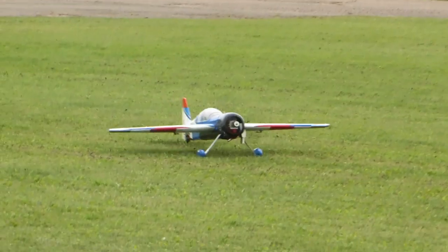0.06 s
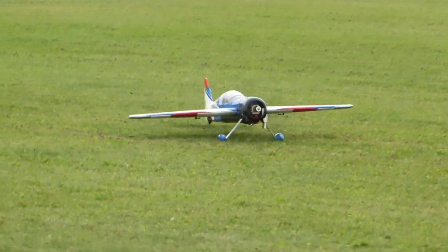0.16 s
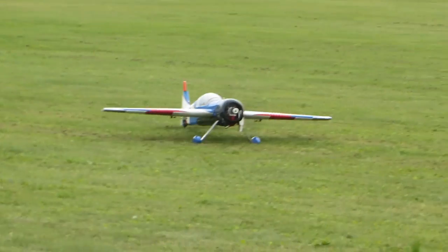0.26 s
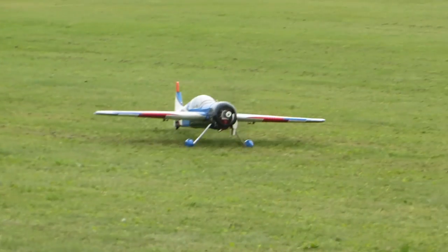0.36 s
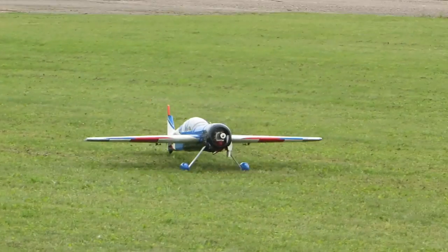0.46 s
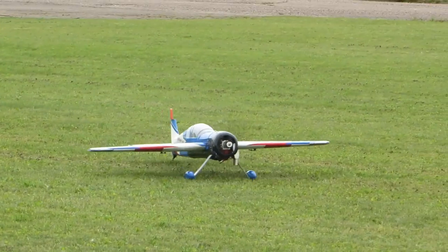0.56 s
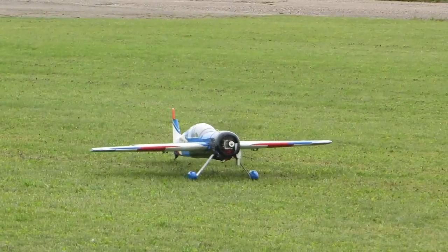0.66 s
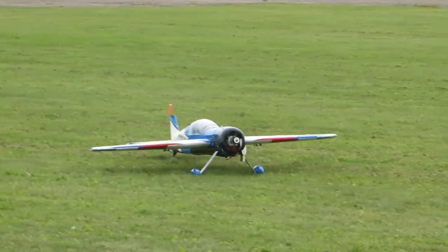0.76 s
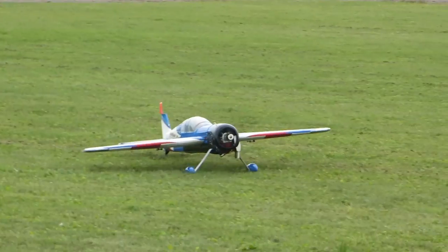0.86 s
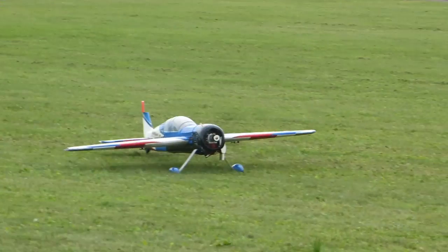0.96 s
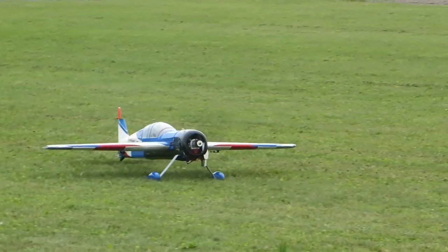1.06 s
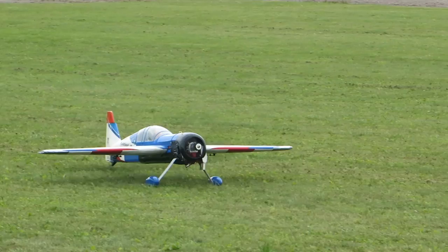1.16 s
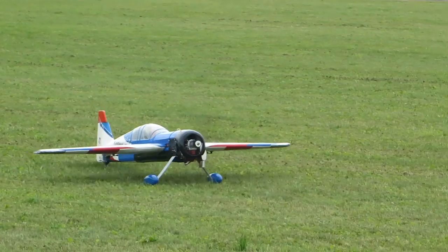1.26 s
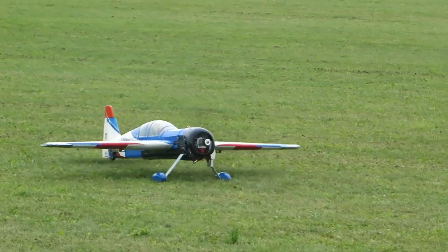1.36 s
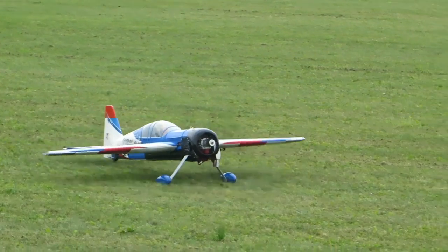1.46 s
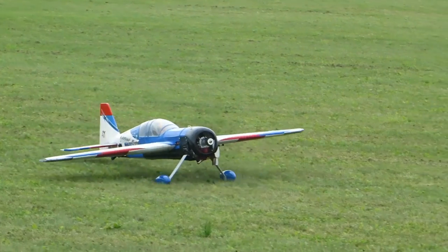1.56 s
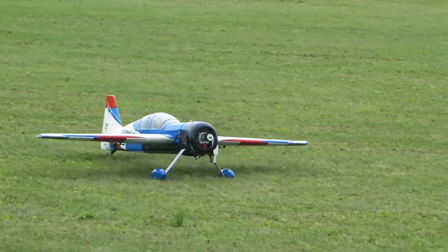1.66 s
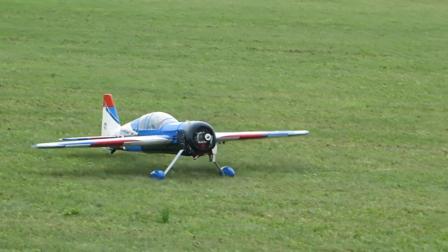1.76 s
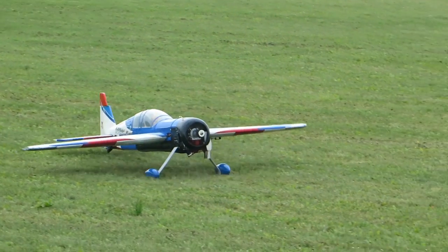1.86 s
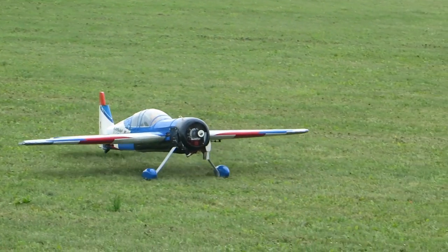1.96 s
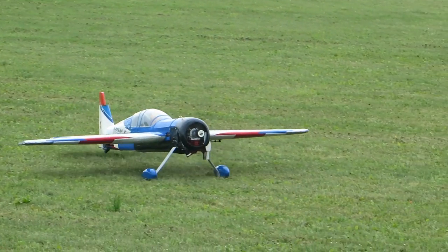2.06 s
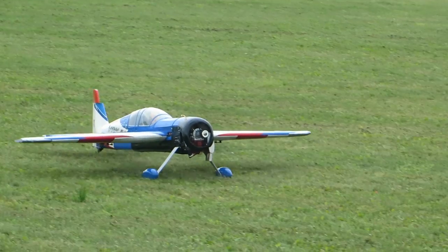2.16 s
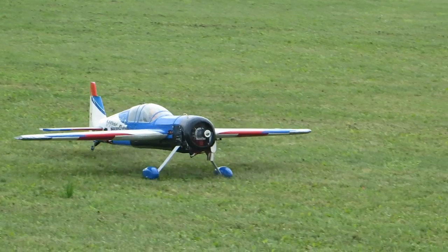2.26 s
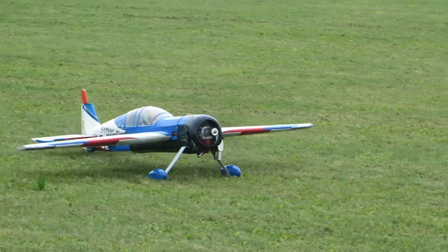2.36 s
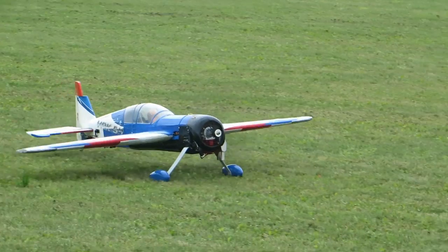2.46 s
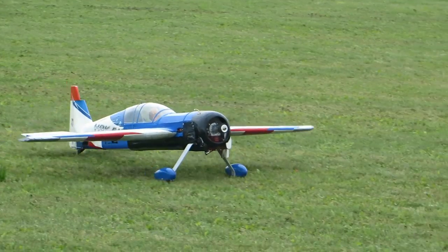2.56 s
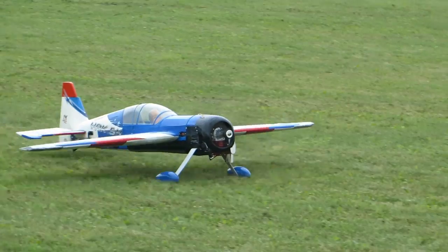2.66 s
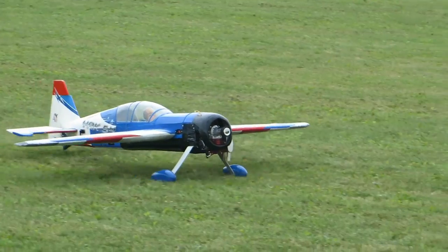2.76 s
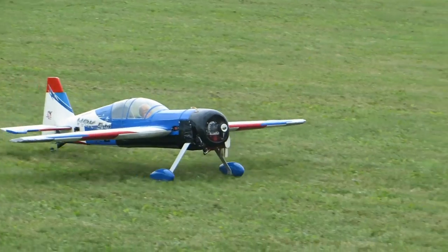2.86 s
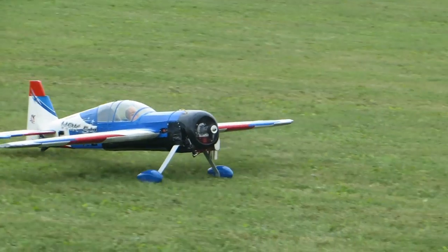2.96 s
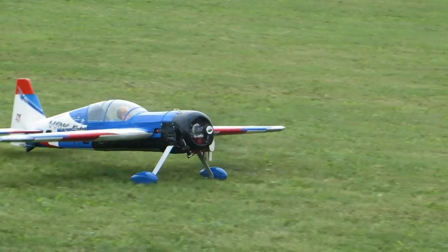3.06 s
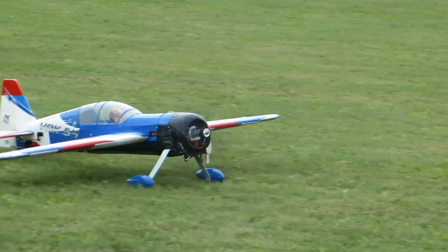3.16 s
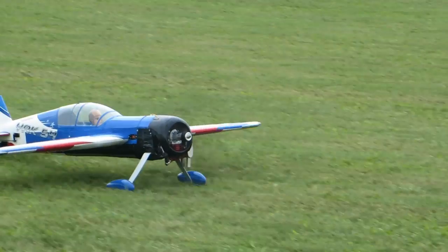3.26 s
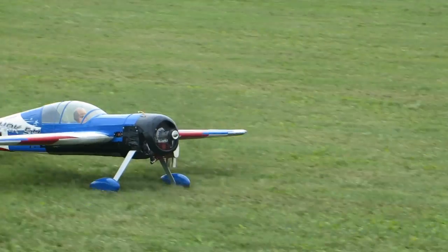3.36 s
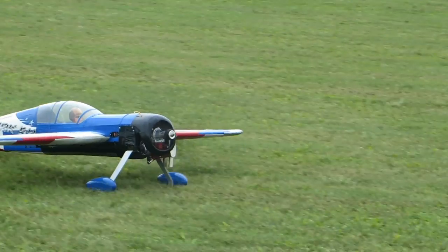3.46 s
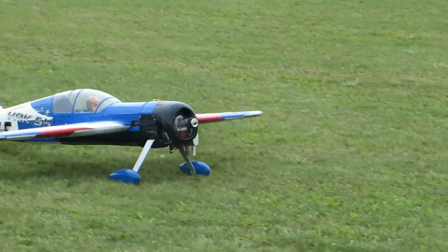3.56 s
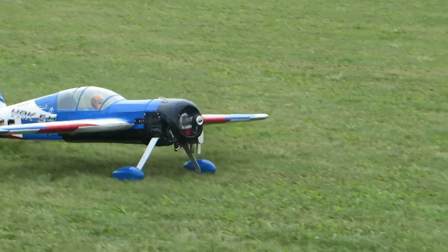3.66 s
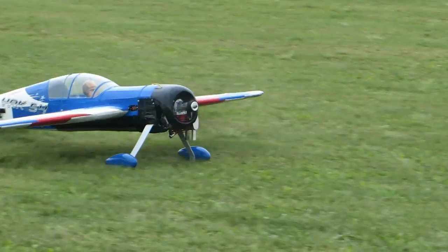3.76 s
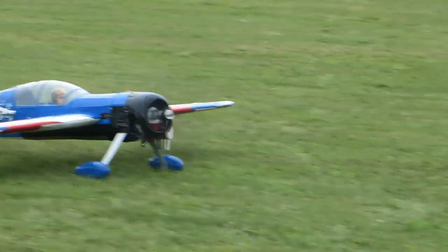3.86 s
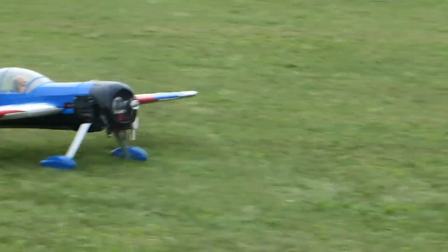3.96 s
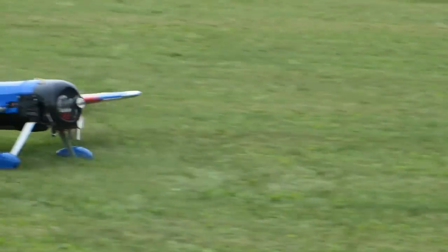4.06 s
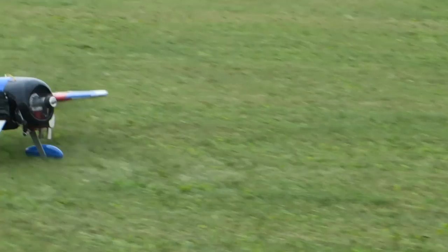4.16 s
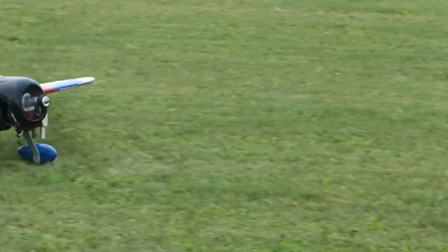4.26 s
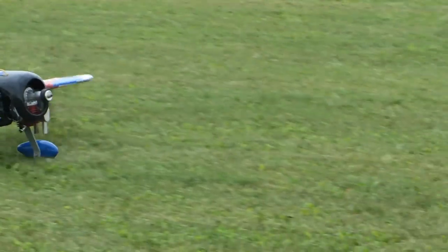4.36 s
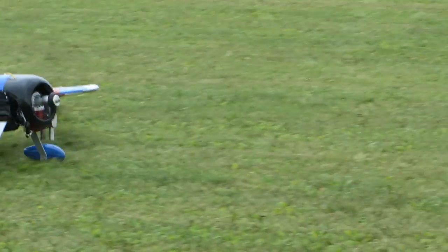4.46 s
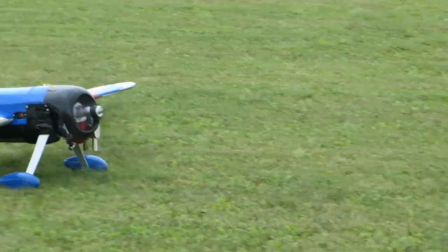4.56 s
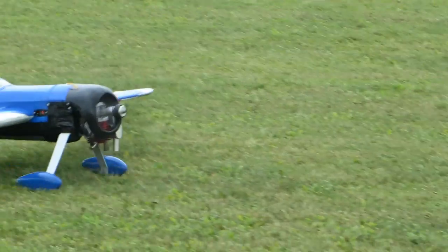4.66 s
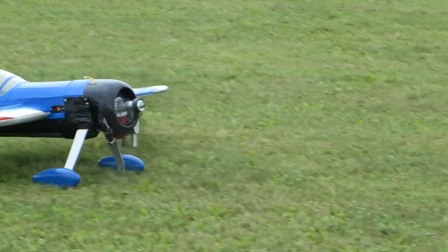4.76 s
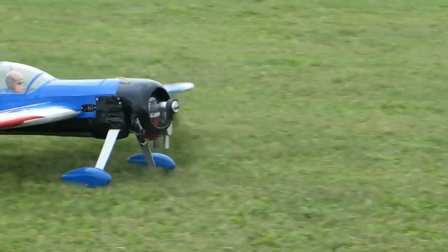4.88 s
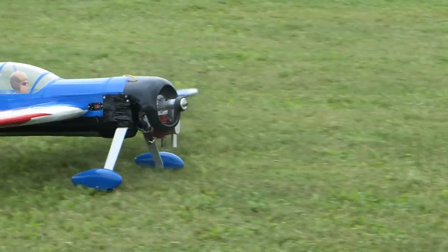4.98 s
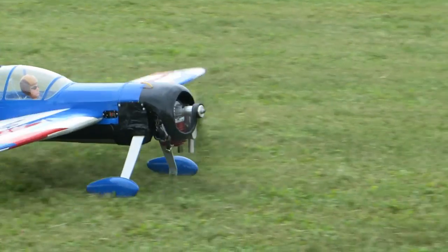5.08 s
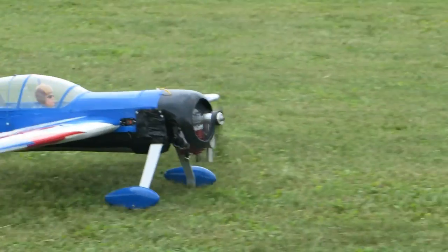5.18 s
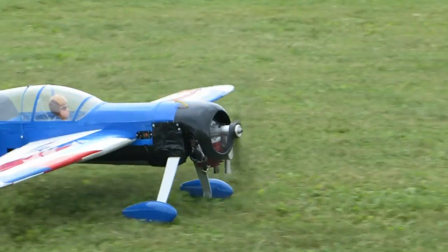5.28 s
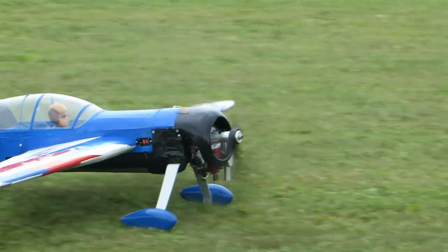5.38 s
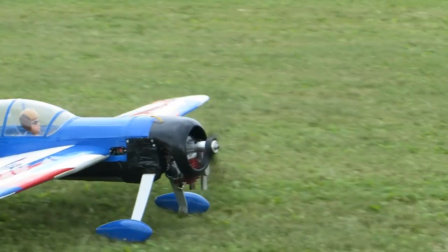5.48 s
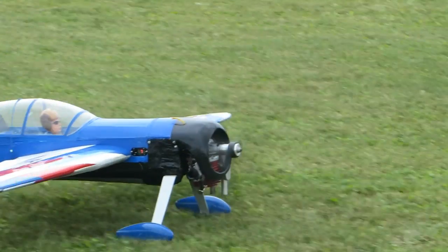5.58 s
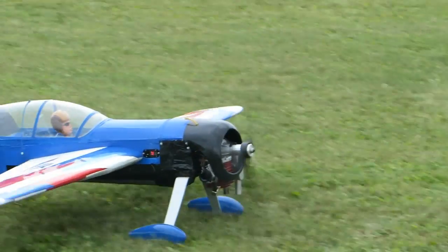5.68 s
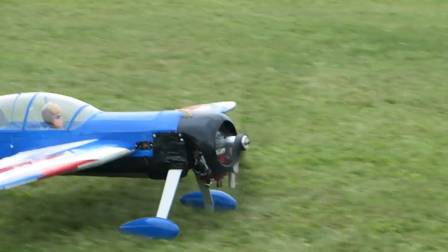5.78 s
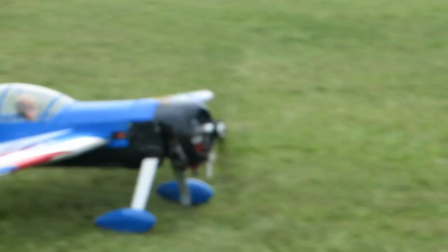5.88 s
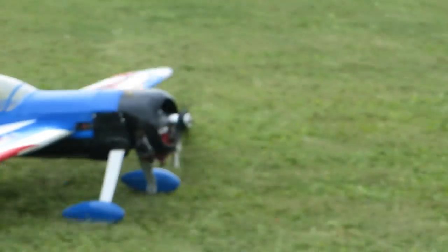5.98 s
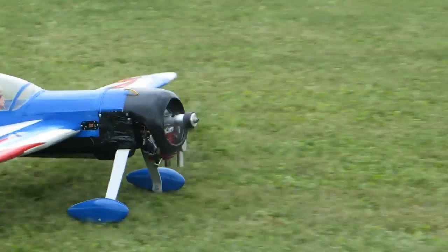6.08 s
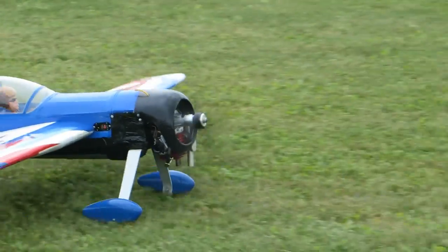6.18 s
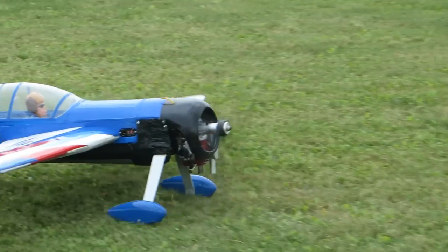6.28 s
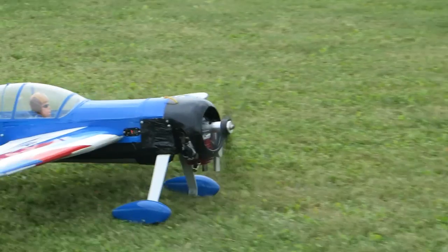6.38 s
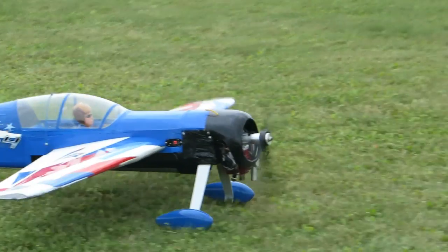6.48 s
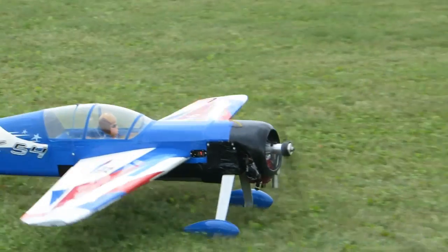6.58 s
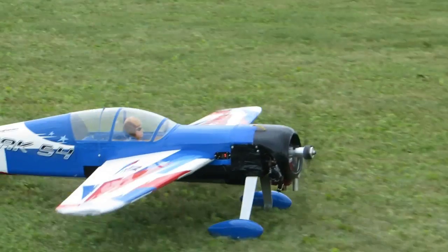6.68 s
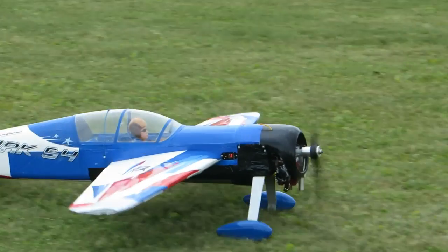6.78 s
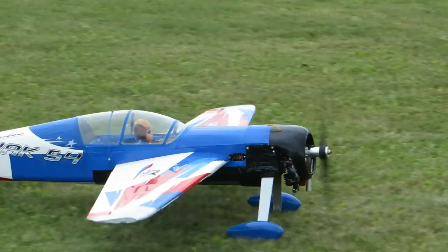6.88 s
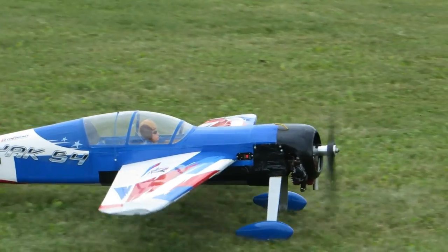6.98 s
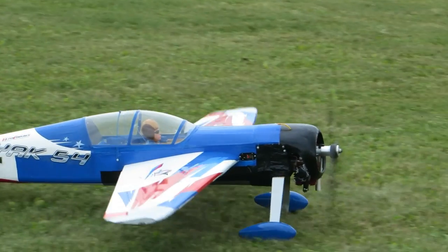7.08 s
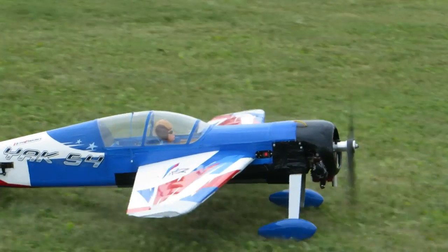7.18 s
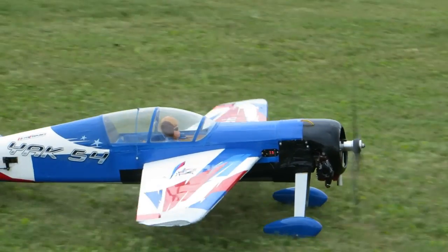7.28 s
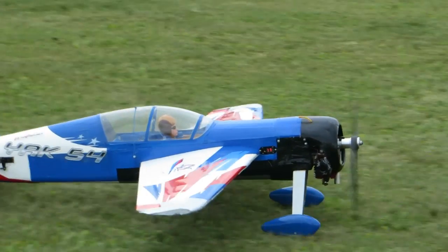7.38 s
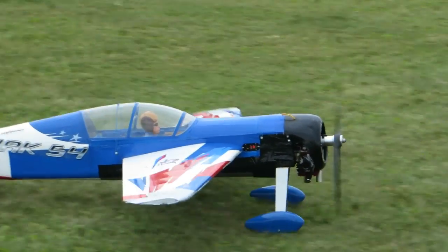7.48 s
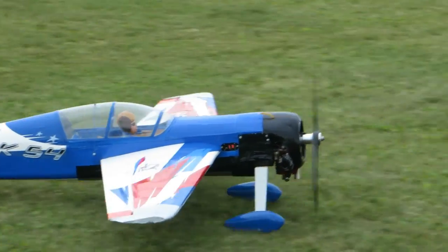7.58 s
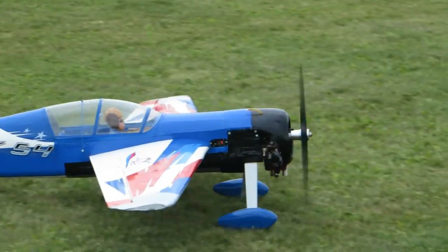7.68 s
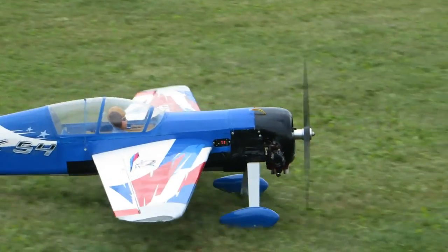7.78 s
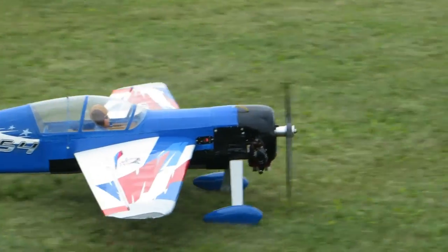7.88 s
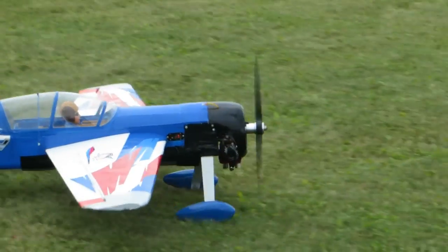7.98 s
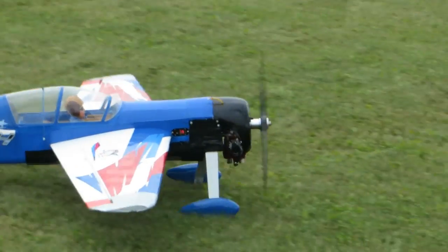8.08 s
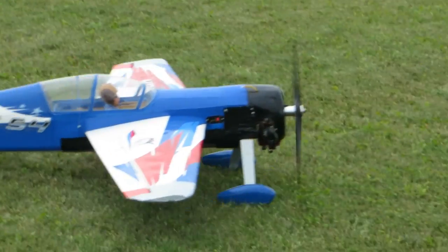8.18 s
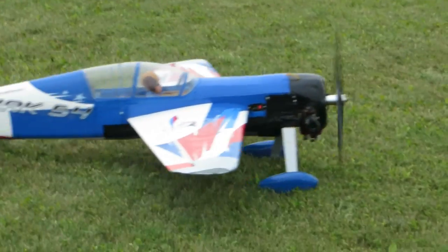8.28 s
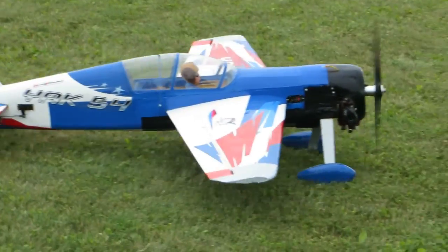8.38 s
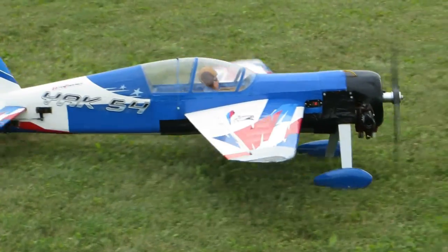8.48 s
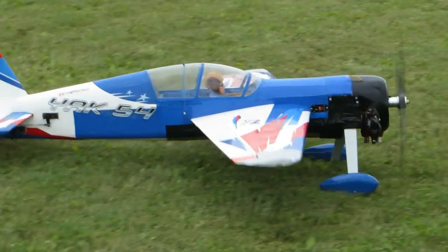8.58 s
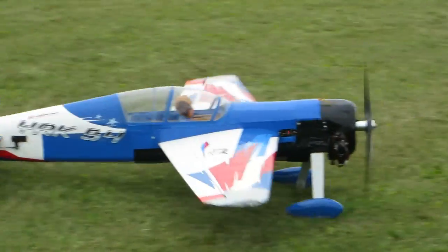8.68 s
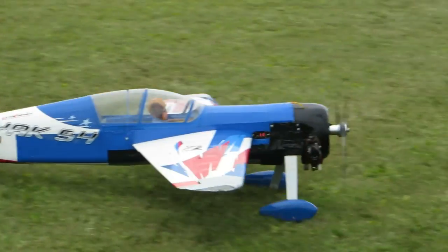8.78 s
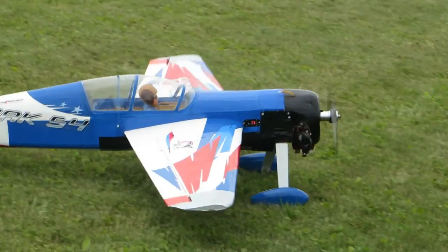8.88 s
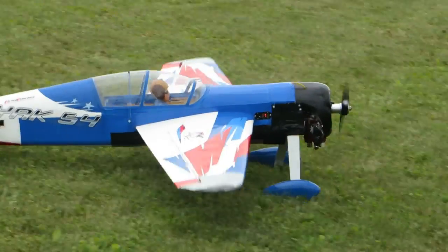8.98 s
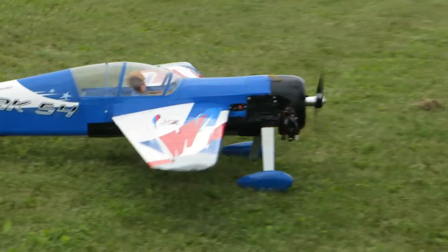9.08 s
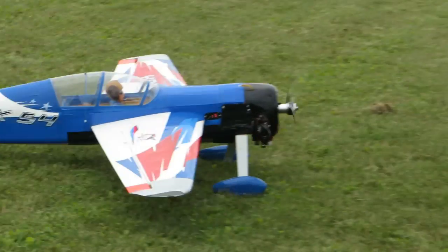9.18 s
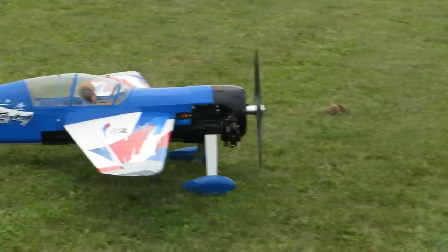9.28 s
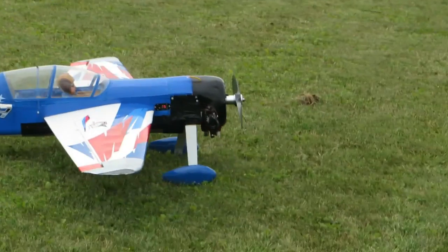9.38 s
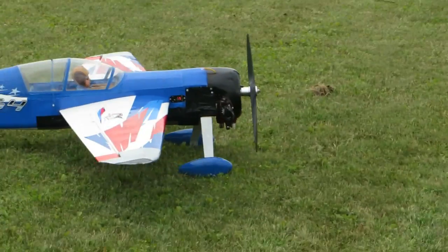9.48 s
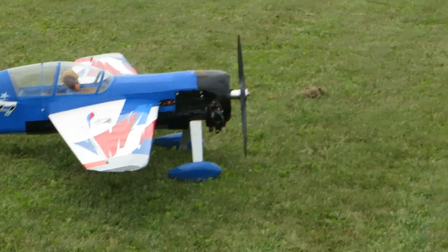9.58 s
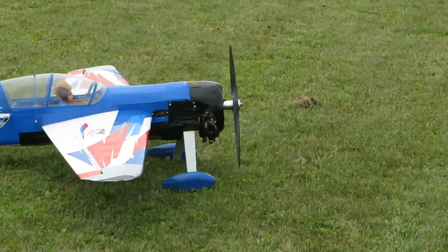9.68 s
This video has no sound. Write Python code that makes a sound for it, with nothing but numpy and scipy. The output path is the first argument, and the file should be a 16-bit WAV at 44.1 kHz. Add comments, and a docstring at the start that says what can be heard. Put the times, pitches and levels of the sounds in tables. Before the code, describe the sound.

A model aircraft's two-stroke petrol engine is already running, puttering quickly and unevenly as it taxis closer over an open grass field. Each firing gives an exhaust pop and a bright metallic crack, with hollow pipe puffs in between, over a low hum, a tinny rattle of loose parts and an airy propeller rasp. The throttle blips briefly at about 1.6 and 2 seconds, more strongly at 3.1, and again around 4. From about 4.5 seconds the engine holds a lumpy idle, its bark a little fuller as the plane turns side-on. At 8.7 seconds it cuts out. The propeller coasts down with slowing, breathy chuffs and soft hollow rings until about 9.4, followed by a few faint knocks and ticks up to 9.7. Soft wind gusts rumble on the microphone now and then, over a faint steady outdoor hush.

```python
"""A model aircraft's two-stroke engine putters as it taxis closer over grass, turns side-on and is cut.
At idle it fires on about every second turn: an exhaust pop and a metallic crack, with a hollow pipe
puff on the missed turns. The shaft hums, loose parts rattle and the propeller tears the air.
After the cut the propeller coasts down against compression; slack parts knock, pipe and intake ring.
Wind buffets the microphone over the hush of an open field."""
import sys
import numpy as np
from scipy import signal
from scipy.fft import rfft, irfft, next_fast_len
from scipy.io import wavfile
from scipy.ndimage import map_coordinates

SR = 44100
rng = np.random.default_rng(int(sys.argv[2]) if len(sys.argv) > 2 else 0)


def master_out(mix):
    """Clip the mix to full scale and print it as 16-bit PCM to the path in sys.argv[1]."""
    frames = np.transpose(np.atleast_2d(mix))
    ceiling = np.clip(frames, -1, 1)
    pcm = np.round(ceiling * 32767).astype(np.int16)
    wavfile.write(sys.argv[1], SR, pcm)


N = 429534
TIME = np.arange(N) / SR
IDLE_HZ = 40.5  # shaft turns a second
PULSE_LEAD_S = 200 / SR  # from the start of a pressure pulse to its peak

# Table levels are relative: each layer adds its own trim.
# shaft speed up to the cut: time_s, turns_per_s
SHAFT_SPEED = [(0.0594, 50.64), (0.24, 41.13), (0.35, 41.1), (0.46, 40.04), (0.57, 40.32), (0.68, 39.72),
               (0.79, 40.12), (0.9, 40.34), (1.03, 40.82), (1.16, 40.82), (1.28, 38.3), (1.38, 38.63),
               (1.48, 39.28), (1.64, 47.68), (1.75, 46.52), (1.86, 45.15), (2.02, 53.72), (2.2, 44.85),
               (2.31, 42.81), (2.41, 42.15), (2.52, 40.47), (2.66, 39.69), (2.8, 40.55), (2.94, 39.01),
               (3.04, 50.33), (3.14, 61.41), (3.27, 53.19), (3.4, 45.48), (3.52, 42.69), (3.58, 41.22),
               (3.7, 44.79), (3.86, 56.43), (3.94, 57.09), (4.06, 59.36), (4.18, 53.05), (4.3, 46.84),
               (4.38, 44.41), (4.52, 43.2), (4.66, 40.88), (4.79, 41.44), (4.92, 40.16), (5.0, 40.86),
               (5.13, 40.18), (5.26, 39.27), (5.38, 39.62), (5.5, 40.52), (5.62, 40.82), (5.78, 38.92),
               (5.96, 40.53), (6.1, 40.69), (6.24, 42.32), (6.34, 39.93), (6.44, 40.34), (6.56, 39.63),
               (6.67, 40.24), (6.79, 40.72), (6.9, 40.22), (7.02, 41.37), (7.13, 40.85), (7.23, 39.47),
               (7.34, 40.16), (7.44, 39.86), (7.54, 40.98), (7.64, 40.53), (7.74, 38.93), (7.88, 39.68),
               (8.02, 39.6), (8.16, 40.9), (8.3, 40.24), (8.44, 39.97), (8.57, 39.53), (8.71, 39.13)]
# faders of the running engine: time_s, throat_db, puff_db, rattle_db
ENGINE_MIX = [(0.0, -29.5, -24.5, -25), (0.38, -23, -24.5, -25.5), (0.9, -24, -25.5, -25),
              (1.48, -21, -30, -26), (1.74, -56, -59, -24), (1.86, -62, -40, -26), (2.14, -38, -24, -24),
              (2.42, -26, -30, -23.5), (2.95, -28, -26, -26.5), (3.1, -38, -28, -26.5),
              (3.3, -25, -19, -26.5), (3.47, -24, -25, -26.5), (3.631, -23, -25, -30),
              (3.729, -34, -35, -28), (4.11, -52, -20.5, -27), (4.16, -25.5, -25, -25.5),
              (4.94, -24, -25.5, -27.5), (5.17, -21.5, -24, -26), (5.572, -27, -25.5, -28.5),
              (6.3, -26, -24, -27), (7.1, -23, -25, -26), (7.549, -24, -27, -28.5), (7.9, -32, -25, -29.5),
              (8.59, -23, -23.5, -27.5), (8.74, -27, -20, -29), (8.82, -23, -20.5, -31.5),
              (9.05, -41, -33, -27.5)]
# bite of the firings: time_s, gas_jet_db, silencer_db, bark_db
FIRING_BITE = [(0, -0.5, -4, -16), (1.2, -2, 3.5, -12.5), (2.2, -5.5, 0, -15.5), (3, 3.5, -1, -12.5),
               (4.2, 5, -2, -12.5), (5.2, 0, -7.5, -8), (6.2, 0.5, -0.5, -8), (7.2, -0.5, 0, -9),
               (8, 2, -2, -7), (8.7, 1.5, 1, -5.5)]
# unfired compressions after the cut: start_s, puff_db, throat_db, chuff_db
COAST_STROKES = [(8.731, -33, -14, -30), (8.754, -16, -9.5, -45), (8.783, -14, -32, -28.5),
                 (8.813, -19, -17.5, -30), (8.849, -17, -30, -30), (8.888, -17, -18, -31),
                 (8.925, -18.5, -18.5, -29), (8.98, -22, -21, -26.5), (9.047, -20, -28, -34),
                 (9.135, -18, -45, -47), (9.232, -26.5, -26.5, -44), (9.376, -42, -48, -42)]
# angle of the aircraft to the listener: time_s, heading (0 nose-on, 1 side-on)
HEADING = [(0, 0.028), (2.5, 0.27), (4, 0.58), (4.8, 0.45), (5.6, 0.59), (9.74, 1)]


def shaft():
    """The engine's rhythm: turn times, which turns fire, and each firing's pop, crack and ring accents."""
    # spells of steady firing: start_s, turns_per_firing, mean_pop_db, first_crack_db, last_crack_db
    spells = [(0.059, 3, -18.9, -9.6, -9.6), (0.121, 2, -21.6, -17.2, -10.6),
              (0.602, 1, -22.1, -17.0, -13.0), (0.703, 2, -18.4, -9.5, -11.6),
              (1.197, 1, -22.4, -15.3, -15.6), (1.274, 2, -19.6, -14.7, -14.7),
              (1.352, 2, -17.1, -8.7, -9.3), (1.662, 1, -20.4, -16.3, -14.4), (1.856, 2, -14.0, -9.2, -9.2),
              (1.941, 1, -19.4, -9.8, -16.4), (2.018, 2, -21.0, -16.4, -16.7),
              (2.137, 1, -22.0, -17.3, -15.3), (2.292, 2, -16.3, -9.6, -9.6),
              (2.339, 1, -20.4, -14.8, -17.6), (2.433, 2, -17.1, -11.0, -11.0),
              (2.506, 1, -19.3, -17.4, -15.6), (2.606, 2, -18.4, -13.5, -16.4),
              (2.956, 1, -14.7, -14.7, -13.9), (3.043, 1, -17.3, -9.9, -17.5),
              (3.149, 3, -17.1, -15.5, -15.5), (3.218, 2, -19.9, -24.7, -20.4),
              (3.394, 2, -16.7, -22.3, -13.1), (3.695, 1, -14.8, -19.1, -11.5),
              (3.779, 1, -18.8, -16.4, -20.4), (3.977, 1, -18.8, -15.5, -18.0),
              (4.062, 2, -17.8, -17.1, -15.3), (4.169, 3, -18.8, -21.4, -16.1),
              (4.33, 2, -16.3, -20.2, -12.7), (4.558, 1, -20.2, -16.8, -16.8),
              (4.582, 2, -19.0, -19.4, -20.0), (4.726, 2, -16.8, -11.9, -11.5),
              (5.07, 1, -20.4, -14.8, -19.1), (5.245, 1, -20.4, -10.2, -15.9),
              (5.371, 2, -16.2, -6.6, -6.6), (5.472, 2, -17.7, -12.9, -8.6), (5.971, 2, -19.9, -7.0, -23.4),
              (6.118, 2, -18.0, -8.1, -18.6), (6.586, 2, -17.2, -11.7, -6.5),
              (6.785, 1, -23.4, -20.0, -20.0), (6.81, 2, -19.2, -17.1, -10.2),
              (7.104, 1, -21.4, -22.3, -21.2), (7.178, 2, -18.0, -15.4, -10.5),
              (7.328, 1, -17.4, -18.2, -18.2), (7.378, 1, -19.0, -7.3, -24.9),
              (7.453, 2, -15.9, -11.6, -10.2), (8.054, 2, -14.1, -19.1, -19.1),
              (8.104, 2, -16.9, -8.8, -20.1), (8.252, 2, -17.6, -10.9, -10.3),
              (8.451, 2, -18.1, -9.4, -24.3), (8.577, 2, -17.0, -9.8, -6.8),
              (8.704, 1, -15.9, -10.4, -10.4)]
    # firings that stand out of their spell: time_s, crack_db, silencer_db, cowl_db, head_db, fins_db
    accents = [(0.453, 1, 4, -5.0, 8, 19), (0.753, 0.5, -5, -0.5, 4.0, 15), (0.803, -1.5, 3.5, 5, 4.0, 13),
               (0.852, 2.5, -4, 3, -4.5, 9), (0.952, 3.5, 7.5, -2.5, 0, -0.5), (1.0, 0, 2, -1.0, 7.0, 12),
               (1.05, 1, -3, -5.0, 5.5, 14.5), (1.099, -0.5, -15, 3, -2, 8),
               (1.274, 1.5, -2, -2.0, 0.5, -3), (1.455, -0.5, 7.5, 8, 9, 5), (1.506, 1.5, -1, -2, 7.5, 8.5),
               (1.553, -4.0, -7, 3.5, 7.0, 5), (1.641, -1.5, 5, 10, 7, -7.0),
               (1.856, -1, -4, 2.5, 9.5, 2.0), (1.9, 5, -12, 0.0, 2.5, -4),
               (2.246, 1.5, -5, -7.0, -6.0, -10), (2.292, 2, 4.5, 4.0, 9, 3), (2.433, 1.5, 2, 7, -0.5, -8),
               (2.556, 4.5, 7, 1, 4, -9), (2.656, 4, -10, 4, 18, 10), (2.956, 6.5, 6, 1.0, -4.0, 6),
               (3.023, 4, 6, 2, -2.5, 0.0), (3.043, 3, 1, 0.0, -3, 2), (3.063, 2.5, 2, -6, -11, 2),
               (3.578, 5, 7, 7, 0.0, -2), (3.672, -1.5, 0, -0.5, 6.5, 10), (3.717, 1, -6, -2.0, 10, 10),
               (3.759, 0, -10, -1.0, 10.5, 0.0), (4.011, -1, 6, 14, 1.5, 4), (4.727, 5, -4, -4, 2, -3),
               (4.824, 0, -5, 4, 10, 18), (4.872, -3, -17, -5, 9, 0.5), (4.971, 5, 10, -8, -0.5, -4.0),
               (5.02, 0.5, -9, 1, 14, 0.0), (5.169, 3, -4, 1.0, -10, -8.0), (5.321, 0, 9, -3.0, -3.0, -3.5),
               (5.371, 0, 7, -1, 2, 9), (5.422, -0.5, 6, -1.5, 0.0, 1.0), (5.472, 0, 9, 1.5, 2.0, 10),
               (5.719, 2, -2, 7, 0.0, -3.0), (5.769, -3.5, 4, 5, 10, 11), (5.921, 2, 4, -7, 16, -3.5),
               (5.971, -1, 2, -8, -5, 8), (6.021, 2.0, -1, -6, -8.0, -5), (6.119, -1.5, 6, 3.0, -7.0, 2.5),
               (6.168, 0, -2, -3, -3, 0), (6.215, 0.5, 5, 4, 10, 6), (6.263, 0.5, 1, 6.5, -5.5, -1.0),
               (6.461, 3.5, 1, 8, -1, 2), (6.51, 2, 9, 7, 11, 2.0), (6.636, 1.5, 2, 0.5, 0.5, -1),
               (6.735, -1, 0, 9.5, -5.5, -13), (6.908, 1.5, -2, 8.5, -7.0, 4), (7.006, 2, -6, -9, 1.5, 5),
               (7.054, 4, -5, -1, 2.5, 3.5), (7.227, -1, 9.5, -1.0, -1.0, 12), (7.278, 2, 4, 4, -4.5, -5),
               (7.453, 0.5, 6, 9, -4.5, 8), (7.502, 4, 4, -7, -3.5, 8), (7.551, 0, 4, -1, -2.5, 7),
               (7.601, -6, -11, 3.5, -1.5, 12), (7.7, 2.0, 2, -3.0, -4.5, -9), (7.802, 1.5, -5, 2, -3.0, 7),
               (7.853, 3, 1, -2.0, 4, -2.5), (7.903, -3.5, -2, 4.5, -0.5, 10), (7.954, 3, 1, 12, -2.0, 0),
               (8.004, 2.5, 6, 2.0, -7.0, 1), (8.104, 3, -1.5, 6, -4.5, -5), (8.154, 2, 4, 9, -6.0, 3.0),
               (8.577, -4, 2, -3, -3, -2), (8.627, -4, -4, -4, -4, 0), (8.678, -4.5, 1, -6, -4, 0),
               (8.704, -6, -1, -6, -4, 0)]
    pop_follows = 0.59  # share of the crack's trend in the pop
    first_s, cut_s = SHAFT_SPEED[0][0], SHAFT_SPEED[-1][0]
    count = np.cumsum(curves(SHAFT_SPEED)[0] * (TIME > first_s)) / SR
    started = TIME >= first_s
    turns = np.interp(np.arange(int(count[int(cut_s * SR)]) + 1), count[started], TIME[started])
    starts = [np.abs(turns - row[0]).argmin() for row in spells] + [len(turns)]
    fired, pop_db, crack_db = [], [], []
    for (_, every, mean_db, first_db, last_db), start, end in zip(spells, starts, starts[1:]):
        spell = np.arange(start, end, int(every))
        trend = np.linspace(first_db, last_db, len(spell))
        fired = np.append(fired, spell).astype(int)
        crack_db = np.append(crack_db, trend)
        pop_db = np.append(pop_db, mean_db + pop_follows * (trend - trend.mean()))
    accent_db = np.zeros((5, len(fired)))
    for s, *db in accents:
        accent_db[:, np.abs(turns[fired] - s).argmin()] = db
    return turns, fired, pop_db, crack_db + accent_db[0], accent_db[1:]


def exhaust_pops():
    """Hot gas leaves on each firing: a pop, the outlet's bark, then a low rebound of suction."""
    turns, fired, pop_db, *_ = shaft()
    times = turns[fired]
    pop_db = pop_db + rng.normal(0, 0.06, len(times))
    bark_db = pop_db + curves(FIRING_BITE, times)[2] + rng.normal(0, 2.8, len(times))
    pops = strike(times - PULSE_LEAD_S, pop_db + 9.5, pulse(hz=370, width_s=0.0014))
    barks = strike(times - PULSE_LEAD_S, bark_db + 1.5, pulse(hz=700, width_s=0.0023))
    rebound = strike(times + 0.0004, pop_db + 0.5, ring(hz=202, t60=0.032, attack=0.0014))
    return pops + barks + rebound


def cracks():
    """Combustion shocks the casing just before the port opens; gas spits and the metal rings on."""
    turns, fired, pop_db, crack_db, accent_db = shaft()
    times = turns[fired]
    crack_scatter_db, ring_scatter_db = rng.standard_normal((len(times), 2)).T
    crack_db = crack_db + crack_scatter_db
    jet_db, silencer_db, _ = curves(FIRING_BITE, times)
    jet = gas_jet(times, crack_db + jet_db)
    ring_db = pop_db + silencer_db + accent_db[0] + ring_scatter_db
    shock = strike(times - 0.0018, crack_db + 7, swell(0.00054, 0.0011))
    shock += strike(times - 0.0015, crack_db - 0.5, swell(0.0033, 0.0028))  # softer tail
    clank = silencer_clank(times, ring_db)
    blow_s = times - 0.0012 + rng.normal(0, 0.00017, len(times))
    blow = pan(-1) * strike(blow_s, crack_db + 14, [1.0])  # the flame front's sharp knock
    pings = cylinder_pings(times, crack_db, accent_db[1:])
    return pings + casing(stereo_noise() * shock + blow) + jet + clank + silencer_note(times, ring_db)


def gas_jet(times, db):
    """Escaping gas spits a bright, uneven burst of noise on each firing."""
    # spit spectrum: frequency_hz, level_db
    colour = [(400, -22), (800, -22), (1500, -13.5), (4000, -12.5), (10000, -23), (15000, -29)]
    bursts = strike(times - 0.0012, db + 10 + rng.normal(0, 3.5, len(times)), swell(0.00049, 0.0019))
    return equalise(stereo_noise() * bursts, colour)


def casing(x):
    """Cylinder and cowl resonances colour x, crossfading as the aircraft turns."""
    # metal resonances: pitch_hz, width_hz, nose_on_db, quarter_on_db, side_on_db
    resonances = [(2186, 42, -6, -2.5, -38), (2764, 57, 6.5, 1.5, -12), (3160, 310, -6, -2.5, -3.5),
                  (3806, 98, -1.5, -1.5, 1), (4100, 100, -8, -5, -1.5), (4456, 34, -0.5, -13, -34),
                  (4800, 46, -6.5, -29, -9), (4990, 22, -11, -2, -29.5), (5480, 64, 1.5, -8, -9.5),
                  (5960, 93, -2, -3.5, -25), (6500, 74, -2, -12.5, -10), (6940, 99, -4, -4.5, -12),
                  (7730, 230, -6.5, -21, -10), (8820, 130, -9.5, -9, -11), (9470, 290, -12.5, -23, -10),
                  (9990, 230, -9, -25, -10), (11400, 1500, -23, -22, -46)]
    hz, width, *views_db = np.transpose(resonances)
    width = np.maximum(width, 85)  # keeps every ring short
    view = 2 * np.clip(curves(HEADING)[0], 0, 1)
    return sum(np.clip(1 - np.abs(view - k), 0, 1) * resonate(x, np.transpose([hz, width, db]))
               for k, db in enumerate(views_db))


def cylinder_pings(times, crack_db, accent_db):
    """A clean ping of the cylinder wall opens each crack; cowl, head and fins ring longer, unevenly."""
    # tuning and balance of the rings: time_s, wall_pitch_hz, wall_db, cowl_db, head_db, fins_db
    voicing = [(0, 3200, -6, -31, -10, -13), (1.3, 3200, -3.5, -17, -17, -16),
               (3.001, 3144, -6.5, -17, -24, -11), (3.6, 3050, -9, -10, -13, -7),
               (4.05, 3000, -4, -11, -17, -22), (4.799, 3073, -3, -17, -20, -27),
               (6.001, 3224, -3, -10.5, -26.5, -19), (6.499, 3250, -3, -13.5, -25, -15),
               (7, 3280, -6, -8.5, -30, -17), (7.299, 3300, -2, -17, -32, -22),
               (8.2, 3320, -5.5, -15, -32, -10), (8.7, 3334, 3, -14, -32, -31)]
    wall_hz, wall_db, *parts_db = curves(voicing, times)
    scatter_hz, scatter_db = 80, 1.6
    chance = rng.standard_normal((len(times), 4)).T
    cowl_db, head_db, fins_db = crack_db + parts_db + accent_db + scatter_db * chance[1:]
    latest = np.maximum(np.searchsorted(times, TIME + 0.005) - 1, 0)  # retune just ahead of each firing

    def note(hz):
        return np.sin(phase_of(hz[latest]))

    def rough_note(hz, rough_db=3, waver_hz=70):
        return note(hz) * amp(rough_db * wobble(250)) * np.cos(phase_of(waver_hz * wobble(150)))

    wall = note(wall_hz + scatter_hz * chance[0])
    wall *= strike(times - 0.0022, crack_db + wall_db + 6.5, swell(0.0008, 0.0011))
    cowl = rough_note(hz=3995 + 11 * over_idle(times))
    cowl *= strike(times - 0.0016, cowl_db + 7, swell(0.00038, 0.0049))
    head = rough_note(hz=5020 + 6 * over_idle(times))
    head *= strike(times - 0.001, head_db + 6, swell(0.00029, 0.0081))
    fins = strike(times - 0.001, fins_db + 4.5, ring(hz=6630, t60=0.021, attack=0.00084))
    return pan(-0.6) * wall + pan(-3) * (cowl + head) + pan(-4) * fins


def silencer_clank(times, db):
    """Each firing jolts the silencer wall into a short, noisy clank."""
    bursts = stereo_noise() * strike(times - 0.001, db + 16.5, swell(0.00017, 0.0021))
    return resonate(bursts, [(1992, 200, 0.87), (2100, 170, -1.8)])


def silencer_note(times, db):
    """A thin note after each firing that sags as the gas cools and sits higher at speed."""
    rest_hz, hot_lift_hz, cooling_s = 1927, 69.8, 0.02
    since_s = TIME - times[np.maximum(np.searchsorted(times, TIME) - 1, 0)]
    hz = rest_hz + hot_lift_hz * np.exp(-np.abs(since_s) / cooling_s) + 6.5 * over_idle(TIME)
    note = np.sin(phase_of(hz + 14 * wobble(60))) * amp(2.9 * wobble(60))
    return pan(-2) * note * strike(times, db - 4.5, swell(0.00013, 0.0094))


def pipe_puffs():
    """On the missed turns cooler gas rings the exhaust pipe with a hollow puff."""
    # resonances of the warm pipe: pitch_hz, level_db, t60_s
    pipe_modes = [(238.2, 9, 0.041), (305.6, 3, 0.046), (404, -18, 0.099)]
    pipe = sum(amp(db) * ring(hz, t60, attack=0.0013) for hz, db, t60 in pipe_modes)
    turns, fired, *_ = shaft()
    missed = np.delete(turns, fired)
    puff_db = curves(ENGINE_MIX, missed)[1] + 9.5 + shaking_db()[(missed * SR).astype(int)]
    puff_db -= 0.4 * over_idle(missed)  # less charge per turn on the overrun
    return strike(missed - 0.001, puff_db + rng.normal(0, 1.3, len(missed)), pipe)


def intake():
    """The intake throat rings on every stroke; unburnt charge kicks back into it on the missed turns."""
    throat = ring(hz=276, t60=0.13, attack=0.0015)
    turns, fired, *_ = shaft()
    missed = np.delete(turns, fired)
    blowback_db = curves(ENGINE_MIX, missed)[0] - 17 + rng.normal(0, 2.5, len(missed))
    breath_db = curves(ENGINE_MIX, turns)[0] + 1 + rng.normal(0, 0.99, len(turns))
    running = strike(missed - 0.001, blowback_db, throat) + strike(turns - 0.0015, breath_db, throat)
    coast_s, _, coast_db, _ = np.transpose(COAST_STROKES)
    return strike(coast_s, coast_db + 5.5, throat) - running


def shaft_hum():
    """Harmonics of the shaft: fuselage hum, propeller thrum, a pipe that sings at speed, throat drone."""
    # harmonics that shake the fuselage: multiple, level_db, phase_rad
    body_orders = [(3, 0, 1.44), (4, -2, 1.1), (5, -4.5, -0.43), (6, 0.5, 0.1), (8, 6, 5)]
    # hollow body resonance: pitch_hz, width_hz, level_db
    fuselage = [(168, 60, 0)]
    # harmonics straight from the propeller: multiple, level_db, phase_rad
    propeller_orders = [(2, 5.5, 0.94), (4, 7, -1.24)]
    # fader of the propeller thrum: time_s, level_db
    thrum_fader = [(0, -49), (0.9, -45), (1.5, -48), (1.7, -45), (2.05, -45), (2.3, -52), (2.8, -55),
                   (3.15, -45), (3.3, -45), (3.5, -34), (3.95, -37), (4.4, -42), (5.4, -39), (6.5, -41),
                   (7.5, -38), (8.0, -33), (8.6, -34), (9.05, -50)]
    # pipe harmonics that sing at speed: multiple, level_db, phase_rad
    rev_orders = [(5, -3, 0.3), (7, -18, 0.38), (9, -3, 0.3), (10, -7, 0.3), (12, -11, 0.32)]
    # fader of the third harmonic: time_s, level_db
    third_fader = [(0, -45), (1.5, -39), (1.75, -30), (2.0, -38), (2.5, -43), (3.2, -33), (3.7, -26),
                   (4.15, -37), (4.6, -33), (6.2, -35.5), (8.6, -34), (9.05, -48)]
    # fader of the seventh harmonic, which meets the throat resonance at idle: time_s, level_db
    seventh_fader = [(0, -31), (0.5, -29), (1.45, -28), (1.6, -26), (1.9, -29), (2.05, -50), (2.25, -24.5),
                     (2.95, -25.5), (3.08, -35), (3.25, -40), (3.5, -22.5), (3.72, -23), (3.95, -51),
                     (4.4, -24.5), (5.2, -27.5), (6.2, -26), (7.0, -28), (7.55, -26), (8.7, -26.5),
                     (9.05, -45)]
    turns, *_ = shaft()
    coast_s = np.transpose(COAST_STROKES)[0]
    lead_in_s = turns[0] - 0.021 * np.arange(3, 0, -1)  # already spinning at the start
    strokes = np.concatenate([lead_in_s, turns, coast_s])
    angle = 2 * np.pi * np.interp(TIME, strokes, np.arange(len(strokes)))

    def partials(orders):
        return [amp(db) * np.cos(k * angle + phase) for k, db, phase in orders]

    body = amp(curves(ENGINE_MIX)[1] - 3 + shaking_db()) * resonate(sum(partials(body_orders)), fuselage)
    thrum = sum(amp(curves(thrum_fader)[0] + wobble(5.3)) * tone for tone in partials(propeller_orders))
    rev = amp(-50.5 + 1.02 * over_idle(TIME)) * sum(partials(rev_orders))
    third = amp(curves(third_fader)[0]) * np.cos(3 * angle + 1.52)
    seventh = np.cos(7 * angle + 0.6 + 0.3 * wobble(12))
    seventh *= amp(curves(seventh_fader)[0] + shaking_db() + 2.1 * wobble(20))
    drone = resonate(seventh, [(289, 75, 0)])
    return (TIME < coast_s[-4]) * (body + thrum + rev + third + drone)


def rattle():
    """Loose parts hiss through the casing, pulsing on each turn and more on firing; thin parts sing."""
    # rattle spectrum: frequency_hz, level_db
    colour = [(350, 5), (600, -1), (974, -11.5), (1720, -8.5), (1950, -1.5), (2340, -15), (2650, -2),
              (3300, -15), (3700, -16.5), (5540, -15), (12300, -35.5), (13700, -27), (15000, -63)]
    # ringing sheet metal, heard nose-on: pitch_hz, width_hz, level_db
    tin_modes = [(1974, 19, 3), (2738, 43, 5.5), (3250, 110, -5), (4510, 53, 3)]
    turns, fired, *_ = shaft()
    heading = curves(HEADING)[0]
    turn_beat = strike(turns - 0.002, rng.normal(-9, 4, len(turns)), swell(0.00065, 0.0011))
    firing_beat = strike(turns[fired], np.full(len(fired), -3), swell(0.0027, 0.0035))
    noise = stereo_noise() * (1.14 + turn_beat + firing_beat) * amp(0.83 * wobble(30))
    hiss = unit(equalise(noise, colour)) + 0.5 * unit(casing(noise * amp(4.9 * wobble(200))))
    sing = 0.38 * heading ** 3 * amp(4.5 * wobble(25)) * unit(resonate(noise, [(5480, 210, 0)]))
    sing *= fade(start_s=8.6, db_per_s=-40)
    tin = 0.83 * (1 - heading) ** 2 * unit(resonate(noise, tin_modes))
    level = amp(curves(ENGINE_MIX)[2] + 2 + shaking_db()) * fade(start_s=9.05, db_per_s=-130)
    return level * unit(hiss + sing + tin)


def shaking_db():
    """Hard firing shakes the airframe more: a level ride that follows the pops."""
    turns, fired, pop_db, *_ = shaft()
    return 0.9 * np.interp(TIME, turns[fired], pop_db - pop_db.mean())


def propeller_wash():
    """Broad rasp of torn air behind the propeller, surging after each firing."""
    # wash fader, rising with throttle: time_s, level_db
    fader = [(0, -37.5), (0.65, -36), (1.5, -37.5), (2.82, -35.5), (3.05, -29), (3.24, -39), (3.52, -32),
             (3.73, -33.5), (3.96, -36), (4.14, -33.5), (5.33, -42), (7.1, -45), (7.33, -37), (7.69, -55),
             (8.57, -43), (8.65, -40), (8.76, -44), (9.3, -69)]
    # rasp spectrum: frequency_hz, level_db
    colour = [(900, -17), (2500, 4.5), (4500, 9.5), (7000, 2.5), (10000, -4), (13500, -17.5), (15500, -46)]
    turns, fired, *_ = shaft()
    surge = 1 + strike(turns[fired] - 0.002, np.zeros(len(fired)), swell(0.004, 0.0061))
    noise = stereo_noise() * surge * amp(2.5 * wobble(120))
    return amp(curves(fader)[0] + 6.5) * unit(equalise(noise, colour))


def coasting_puffs():
    """After the cut each stroke pushes cold gas down the pipe, which now rings lower."""
    times, db, *_ = np.transpose(COAST_STROKES)
    push = strike(times - PULSE_LEAD_S + 0.0022, db, pulse(hz=260, width_s=0.0021))
    return push + strike(times - 0.002, db + 4.5, ring(hz=194, t60=0.12, attack=0.0013))


def coasting_chuffs():
    """A breathy chuff on each cold stroke as the propeller runs down."""
    # resonances the cold strokes excite: pitch_hz, width_hz, level_db
    chuff_modes = [(560, 170, 4.5), (1370, 150, 3), (2010, 140, 3.5), (2730, 170, -2), (3480, 250, -2),
                   (4000, 200, -14), (5300, 260, -8)]
    times, _, _, db = np.transpose(COAST_STROKES)
    return resonate(stereo_noise() * strike(times - 0.004, db + 15.5, swell(0.0008, 0.006)), chuff_modes)


def settling():
    """Slack parts knock and tick; the cold pipe and intake ring softly on the last strokes."""
    # hollow rings of cold pipe and intake, with a faint higher ring: start_s, pitch_hz, level_db, t60_s
    last_rings = [(9.043, 206, -24, 0.11), (9.127, 198, -21, 0.14), (9.17, 278, -20.5, 0.18),
                  (9.28, 655, -47, 0.99), (9.32, 270, -40.5, .1), (9.385, 694, -41, 0.15),
                  (9.386, 197, -23.5, 0.21), (9.5, 270, -38, 0.29)]
    # knocks of shaft and airframe: start_s, level_db, pitch_hz, tick_db
    slack_knocks = [(9.0034, -26, 1860, -25), (9.0396, -22, 2740, -35), (9.0722, -20, 2710, -38),
                    (9.1234, -29, 1440, -37), (9.154, -22.5, 2840, -53), (9.1849, -48, 1970, -37),
                    (9.215, -28, 2720, -54), (9.2293, -35, 2070, -26), (9.3211, -39, 2100, -49),
                    (9.362, -36, 2670, -50), (9.389, -25.5, 1830, -39), (9.545, -27, 1170, -49),
                    (9.572, -27, 2800, -38.5), (9.6793, -37, 2360, -52)]
    knocks = np.zeros(N)
    for s, db, hz, _ in slack_knocks:
        burst = strike([s], [db + 8], swell(0.0013, 0.011)) * rng.standard_normal(N)
        knocks += resonate(burst, [(hz, 250, 0), (2750, 400, -8)])
    times, _, _, tick_db = np.transpose(slack_knocks)
    ticks = strike(times, tick_db + 6, swell(0.0012, 0.0076)) * rng.standard_normal(N)
    rings = sum(strike([s], [db], ring(hz, t60, attack=0.0098)) for s, hz, db, t60 in last_rings)
    return knocks + resonate(ticks, [(5900, 2100, 0)]) + rings


def grass_scatter(x):
    """Short scatter off the grass widens x to stereo, drifting as the aircraft rolls."""
    tails = rng.standard_normal((2, 800)) * amp(-np.linspace(0, 30, 800))
    first, second = signal.fftconvolve(x[None], tails / np.linalg.norm(tails[0]), axes=1)[:, :N]
    drift = 2 * wobble(3)
    side = np.cos(drift) * first + np.sin(drift) * second
    return x + amp(-18.5) * np.outer([1, -1], side)


def wind():
    """Gusts buffet the microphone with a lumpy rumble."""
    # gusts: peak_s, level_db
    gusts = [(0, -21.5), (1.25, -30), (1.65, -49), (2.71, -27.5), (2.96, -44), (3.5, -26), (3.991, -29),
             (5.91, -36), (6.35, -37), (7.27, -54), (8.33, -31), (9.0, -28)]
    # rumble spectrum: frequency_hz, level_db
    colour = [(20, 5), (40, 21), (80, 12), (150, 13), (250, 12), (500, -49)]
    calm_db, slope_db_per_s = -55, -72
    rumble = amp(3 * wobble(8)) * equalise(stereo_noise(), colour)
    level = amp(calm_db) + sum(amp(db + slope_db_per_s * np.abs(TIME - s)) for s, db in gusts)
    return amp(5.5) * level * unit(rumble)


def field_hush():
    """Steady open-air hush that dips briefly around the last strokes."""
    # hush fader: time_s, level_db
    fader = [(0, -42.5), (9.26, -41.5), (9.3, -56), (9.38, -45), (9.74, -44.5)]
    # hush spectrum: frequency_hz, level_db
    colour = [(40, 16), (100, 2), (300, 6), (600, 2), (1500, 2.5), (3000, -1.5), (8000, -9), (11000, -17),
              (13000, -45)]
    return amp(curves(fader)[0]) * unit(equalise(stereo_noise(), colour))


def stereo_noise():
    """Noise with the width, lean and phase of the two microphone ports."""
    # left-right likeness: frequency_hz, correlation
    likeness = [(60, .99), (1000, .98), (2000, .94), (3300, .9), (5500, .8), (9000, .75), (15000, .62)]
    # balance: frequency_hz, left_minus_right_db
    lean = [(60, 0), (1200, 0), (2000, -2), (3300, 0), (5500, -3.5), (9000, .5), (13000, 4.5), (15000, 5)]
    # phase shift of the port cavities: frequency_hz, left_lead_rad
    lead = [(60, 0), (5860, -.2), (6720, 1.4), (7320, 1.2), (7750, 0), (9220, .3), (9820, 1.5), (12200, .1)]

    def width(hz):
        angle = np.arccos(np.clip(along(likeness, hz), -1, 1)) / 2
        return np.array([np.cos(angle), np.sin(angle)])

    def ports(hz):
        return pan(along(lean, hz)) * np.exp(1j * np.outer([0.5, -0.5], along(lead, hz)))

    mid, side = filtered(rng.standard_normal((2, N)), width)
    return filtered(np.array([mid + side, mid - side]), ports)


def over_idle(times):
    """Shaft speed above idle, in turns a second."""
    return curves(SHAFT_SPEED, times)[0] - IDLE_HZ


def amp(db):
    """dB to gain."""
    return 10 ** (np.asarray(db) / 20)


def pan(left_minus_right_db):
    """Left and right gains."""
    return amp(np.outer([0.5, -0.5], left_minus_right_db))


def fade(start_s, db_per_s):
    """Full gain until start_s, then a steady slope in dB."""
    return amp(db_per_s * np.maximum(TIME - start_s, 0))


def unit(x):
    """Scaled to rms 1."""
    return x / np.sqrt(np.mean(x ** 2) + 1e-20)


def phase_of(hz):
    """Running phase of a moving pitch."""
    return 2 * np.pi * np.cumsum(hz) / SR


def along(points, hz):
    """(frequency_hz, value) points read on a log axis."""
    knots_hz, values = np.transpose(points)
    return np.interp(np.log(hz + 1), np.log(knots_hz + 1), values)


def curves(rows, times=TIME):
    """Each column after time_s, read at the given times."""
    knots_s, *columns = np.transpose(rows)
    return [np.interp(times, knots_s, column) for column in columns]


def wobble(rate):
    """A smooth random curve, rate knots a second."""
    return map_coordinates(rng.standard_normal(int(N * rate / SR) + 4), [TIME * rate])


def filtered(x, response):
    """x through a complex response of frequency."""
    size = next_fast_len(N + SR // 2)
    return irfft(rfft(x, size) * response(np.fft.rfftfreq(size, 1 / SR)), size)[..., :N]


def equalise(x, colour):
    """x through an EQ curve: frequency_hz, level_db."""
    return filtered(x, lambda hz: amp(along(colour, hz)))


def resonate(x, modes):
    """x through parallel resonances of alternating polarity: pitch_hz, width_hz, level_db."""
    return filtered(x, lambda f: sum((-1) ** k * amp(db) * 1j * f * width / (hz**2 - f**2 + 1j * f * width)
                                     for k, (hz, width, db) in enumerate(modes)))


def strike(times, db, shape):
    """The shape played at each time with its own level."""
    samples = np.clip(np.round(np.asarray(times) * SR).astype(int), 0, N - 1)
    return signal.fftconvolve(np.bincount(samples, amp(db), N), shape)[:N]


def pulse(hz, width_s):
    """A pressure pulse: a cosine under a bell curve."""
    t = np.arange(-200, 200) / SR
    return np.cos(2 * np.pi * hz * t) * np.exp(-(t / width_s) ** 2)


def ring(hz, t60, attack):
    """A dying sine that starts by suction."""
    t = np.arange(SR // 2) / SR
    return -np.sin(2 * np.pi * hz * t) * amp(-60 * t / t60) * (1 - np.exp(-t / attack))


def swell(rise_s, fall_s):
    """Envelope of one burst, peak 1."""
    t = np.arange(SR // 10) / SR
    shape = (1 - np.exp(-t / rise_s)) ** 2 * np.exp(-t / fall_s)
    return shape / shape.max()


def scene():
    """The aircraft's body, widened by the grass, under its metal and rasp, in open air."""
    body = grass_scatter(exhaust_pops() + pipe_puffs() + intake() + shaft_hum()
                         + coasting_puffs() + settling())
    return body + cracks() + rattle() + coasting_chuffs() + propeller_wash() + wind() + field_hush()


def record(dry):
    """The microphone drops deep bass and top treble, rounds off peaks and limits the band."""
    # microphone response: frequency_hz, gain_db
    microphone = [(20, -29), (55, -12.5), (100, -5), (140, -3), (12500, -3.5), (14500, -13.5), (16000, -38)]
    ceiling, top_hz = 0.98, 16200
    heard = equalise(dry, microphone)
    soft = heard / (1 + np.abs(heard / ceiling) ** 6) ** (1 / 6)
    return filtered(soft, lambda hz: hz < top_hz)


dry = scene()
out = record(dry)
master_out(out)
```